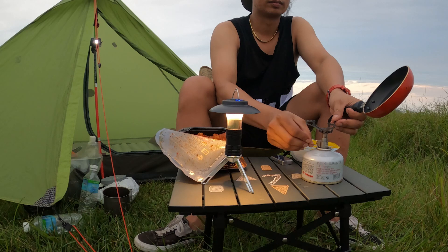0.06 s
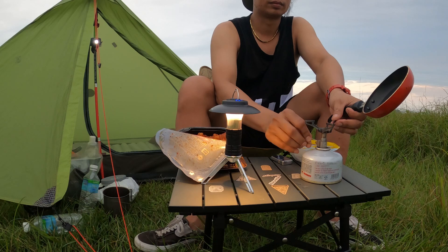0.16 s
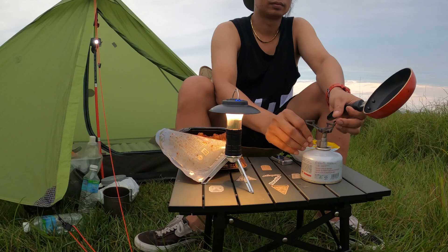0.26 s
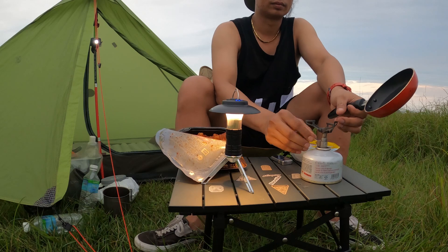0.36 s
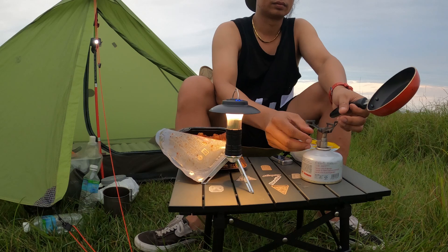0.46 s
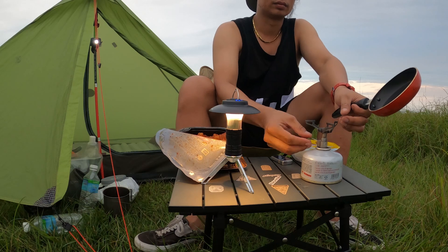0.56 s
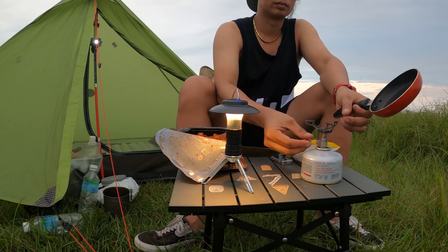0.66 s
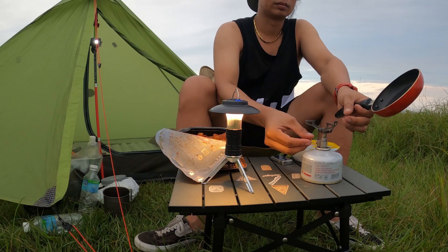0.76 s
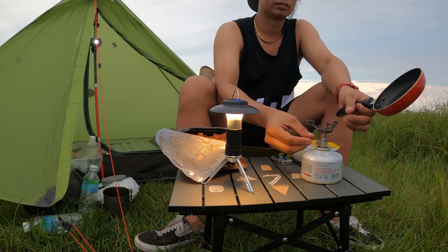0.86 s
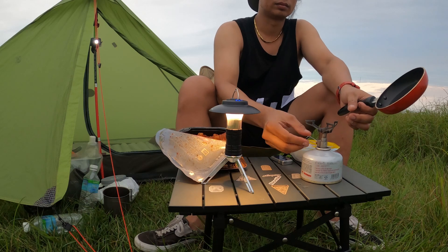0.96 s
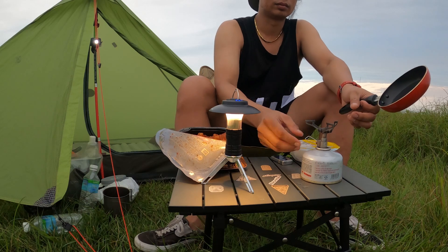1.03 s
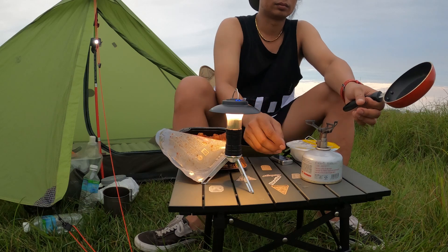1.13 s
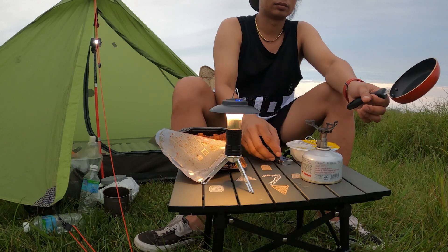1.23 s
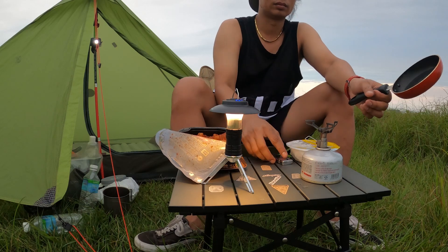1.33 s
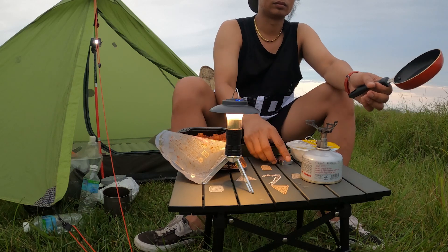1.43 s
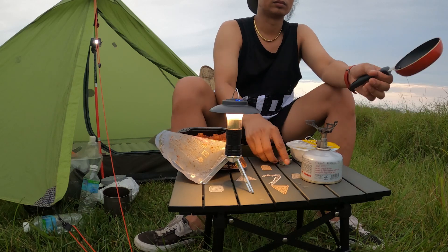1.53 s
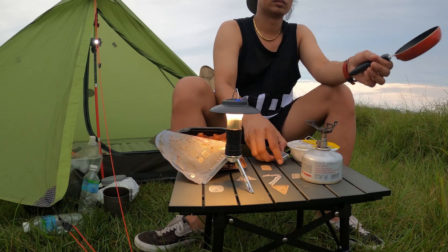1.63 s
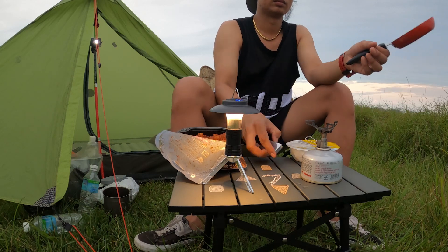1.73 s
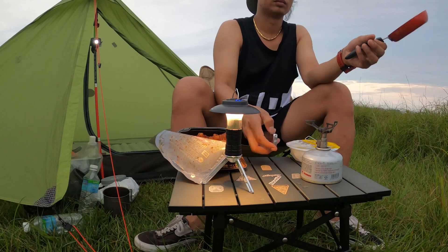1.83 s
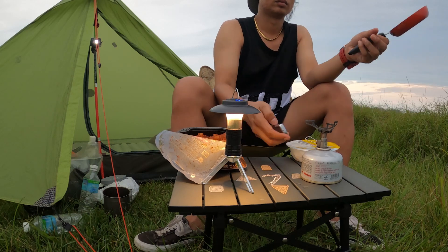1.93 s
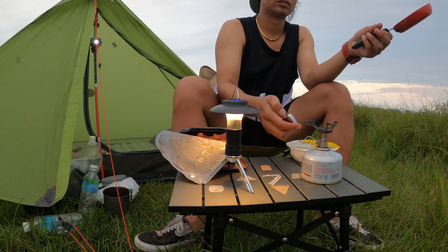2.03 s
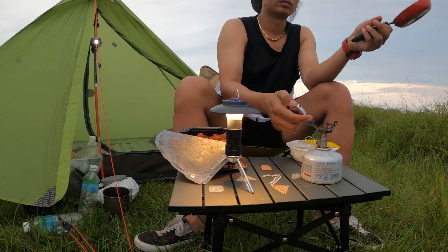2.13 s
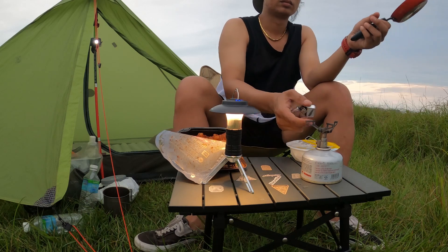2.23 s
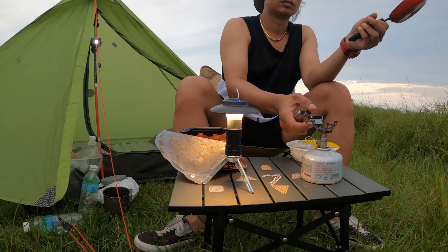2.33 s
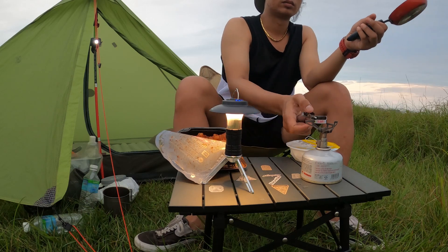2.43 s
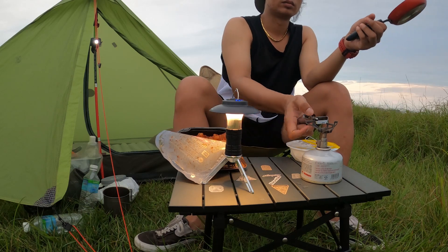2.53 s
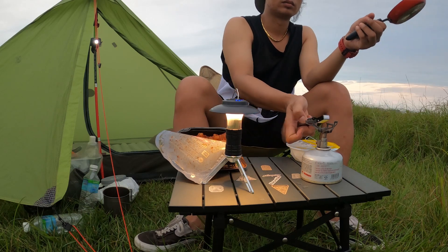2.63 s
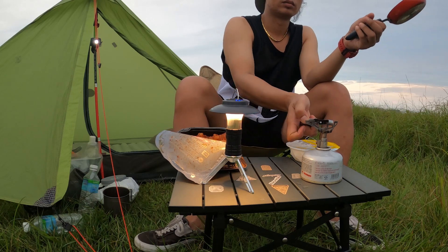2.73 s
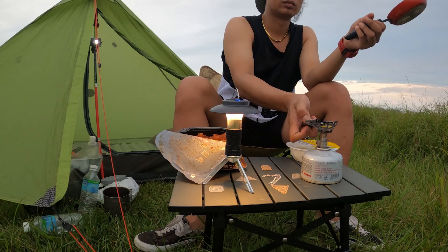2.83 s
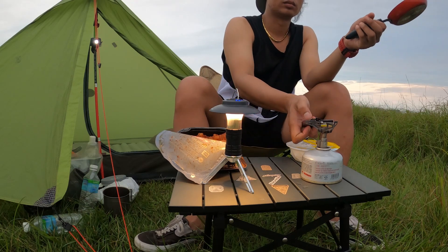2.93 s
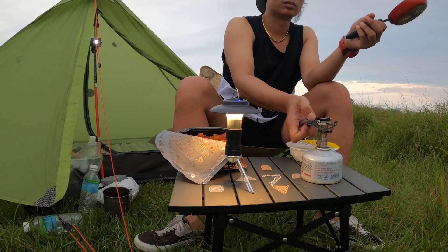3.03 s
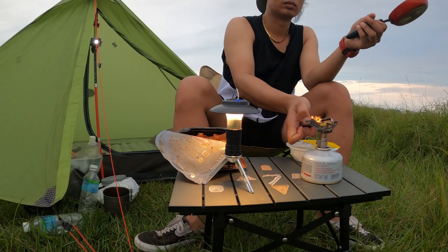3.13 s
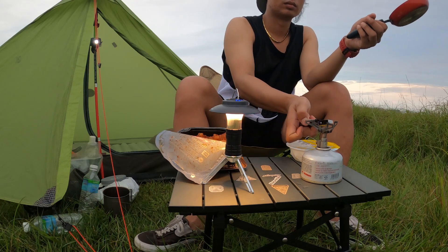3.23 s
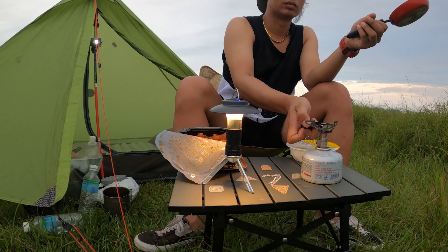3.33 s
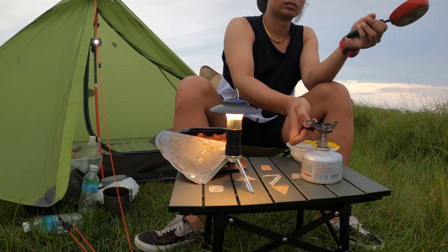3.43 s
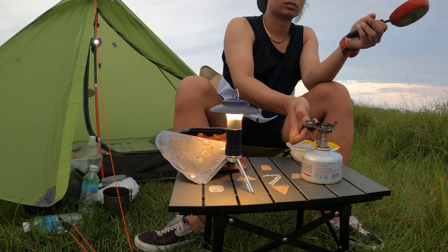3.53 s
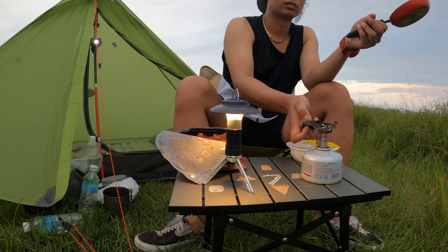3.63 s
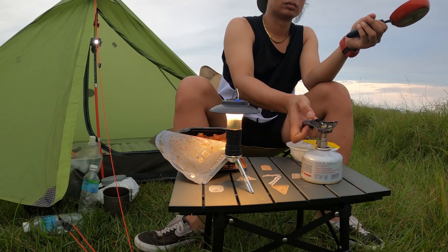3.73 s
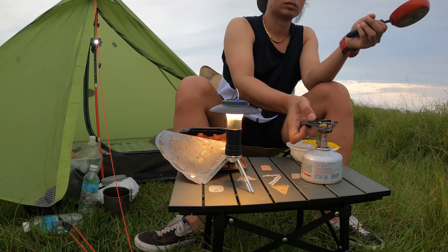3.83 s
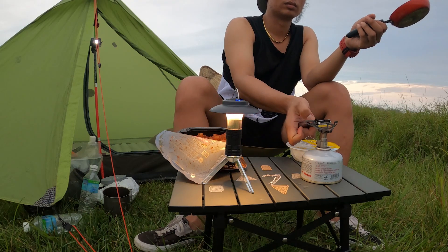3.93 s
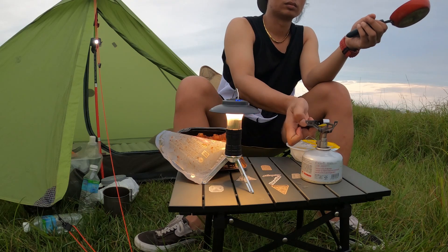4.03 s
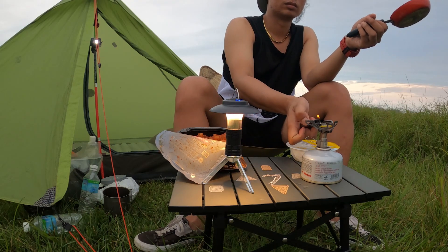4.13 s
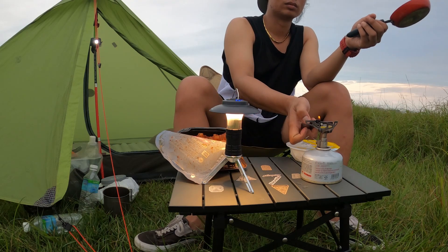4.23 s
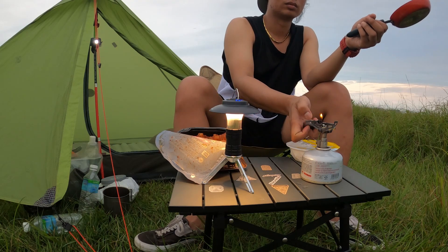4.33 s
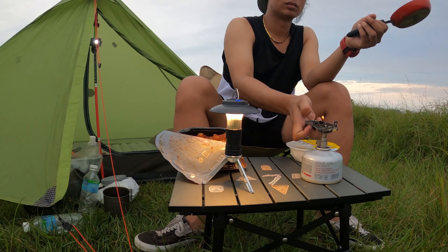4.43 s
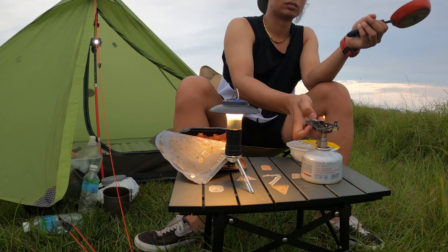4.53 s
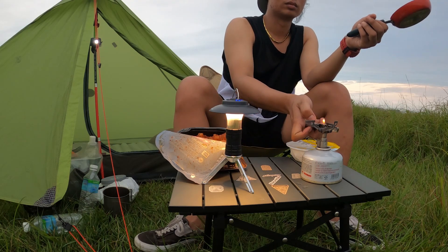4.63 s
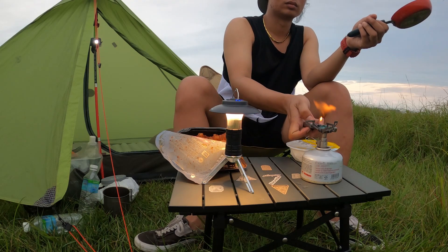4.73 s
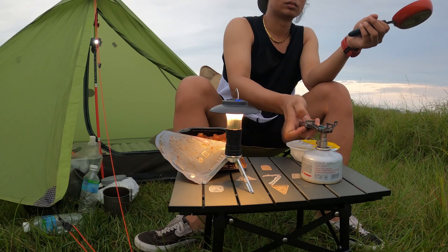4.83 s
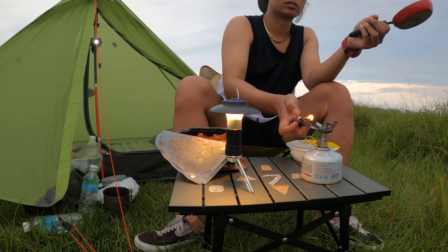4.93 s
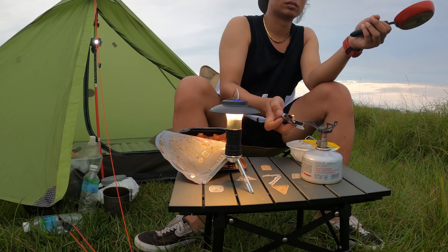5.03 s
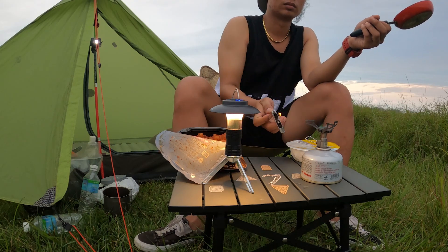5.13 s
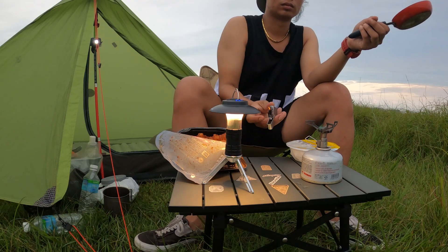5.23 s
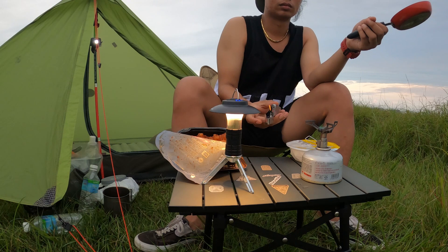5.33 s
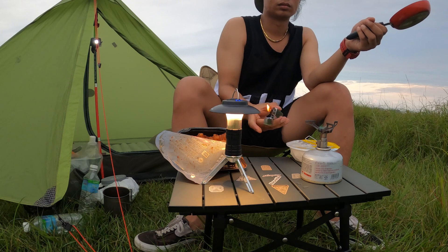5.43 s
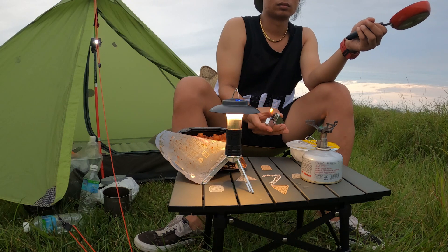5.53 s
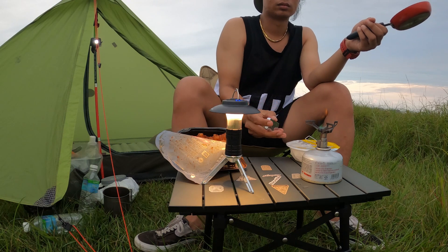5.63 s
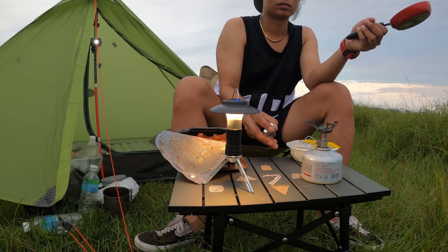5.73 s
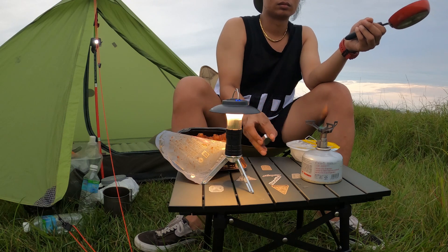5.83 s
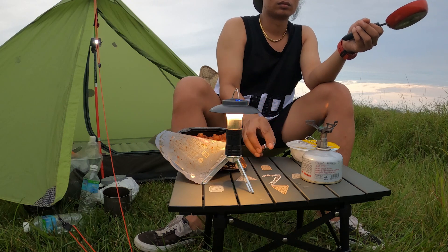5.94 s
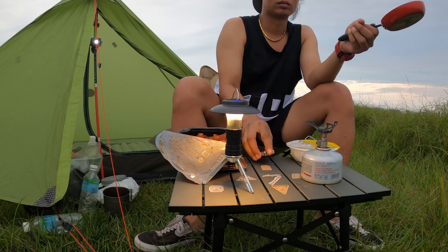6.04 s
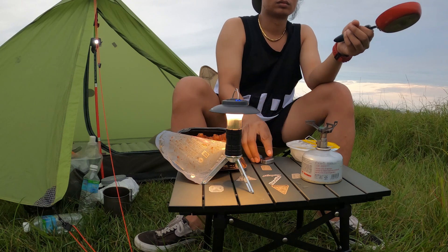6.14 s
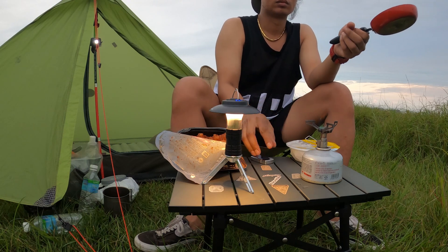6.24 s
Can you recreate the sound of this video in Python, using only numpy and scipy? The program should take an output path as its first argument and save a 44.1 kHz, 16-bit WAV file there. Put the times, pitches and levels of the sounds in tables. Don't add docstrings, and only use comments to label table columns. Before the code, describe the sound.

Outdoors, with low light wind and thin insect trills, a valve is tapped and turned, and a bright rough gas hiss begins and continues. A steel lighter clatters off the table, clicks open and grinds three times without success. A short fourth strike sets off a deep whump and soft crackling flame roar. One hard metallic snap closes the lid, then light knocks. Close microphones, dry open air.

```python
import sys
import numpy as np
from scipy import signal
from scipy.fft import rfft, irfft, next_fast_len
from scipy.io import wavfile
from scipy.ndimage import uniform_filter1d

SR = 44100
rng = np.random.default_rng(int(sys.argv[2]) if len(sys.argv) > 2 else 0)


def gain_from_db(level_db):
    decades = np.asarray(level_db, float) / 20
    return 10 ** decades


def to_wav(sig):
    pcm = np.clip(np.atleast_2d(sig), -1, 1) * 32767
    pcm = np.round(pcm).astype(np.int16)
    wavfile.write(sys.argv[1], SR, pcm.T)


N = 276948
THUMP_S = 4.869


def evened(x):
    return x / np.sqrt(np.mean(x ** 2) + 1e-20)


def curve(rows):
    return np.interp(np.arange(N) / SR, *np.transpose(rows))


def add(mix, s, sound):
    part = mix[round(s * SR):][:len(sound)]
    part += sound[:len(part)]


def ring(x, hz, width_hz):
    return signal.lfilter(*signal.iirpeak(hz, hz / width_hz, SR), x)


def low_pass(x, order, hz):
    return signal.lfilter(*signal.butter(order, 2 * hz / SR), x)


def noise(colour, size, patchy_db, flicker_db):
    hz = np.fft.rfftfreq(size, 1 / SR)
    frames = 4 * N // size + 5
    a, b, patches = rng.standard_normal((3, frames, len(hz)))
    patches = evened(uniform_filter1d(uniform_filter1d(patches, 8, 0), 6, 1))
    flicker = rng.standard_normal(frames)
    flicker = evened(uniform_filter1d(flicker, 3) - uniform_filter1d(flicker, 25))[:, None]
    f, level_db = np.transpose(colour)
    shape_db = np.interp(np.log(hz + 1), np.log(f), level_db, left=level_db[0] - 7, right=-90)
    spectra = (a + 1j * b) * gain_from_db(shape_db + patchy_db * patches + flicker_db * flicker)
    return evened(signal.istft(spectra.T, nperseg=size, noverlap=3 * size // 4)[1][:N])


def ports(x, loose, aside):
    # pitch_hz, right_minus_left_db, lead [radians], likeness [0-1]
    port_rows = [(0, 0, 0, 1), (150, .3, .03, .998), (900, 2.5, .2, .98), (2300, 0, .8, .93),
                 (4300, -2.5, 1.2, .92), (5600, -5, 2.5, .92), (6050, 0, 3.15, .95), (6800, 8, 4, .85),
                 (7700, 14, 5.7, .75), (8200, 3, 6.6, .8), (9100, 0, 6.4, .75), (9900, -8, 7.7, .35),
                 (11000, -2, 9.5, .6), (14000, 0, 12.3, .5)]
    size = next_fast_len(N + SR // 10)
    hz, t = np.fft.rfftfreq(size, 1 / SR), np.arange(2000) / SR
    f, more_db, lead, same = np.transpose(port_rows)
    same = np.clip(np.interp(hz, f, same), 0, 1) ** loose
    scatter = rfft(rng.standard_normal(len(t)) * gain_from_db(-60 * t / 0.04), size)
    scatter /= np.sqrt(uniform_filter1d(abs(scatter) ** 2, 1000))
    turned = same * np.exp(1j * aside * np.interp(hz, f, lead))
    right = turned + np.sqrt(1 - same ** 2) * scatter
    right = right * gain_from_db(aside * np.interp(hz, f, more_db))
    return np.array([x, irfft(rfft(x, size) * right, size)[:N]])


def wind():
    # time_s, level_db
    gusts = [(0.0, -60), (1.15, -58), (1.9, -60.5), (3.9, -60.5), (4.4, -59), (6.28, -57)]
    # pitch_hz, level_db
    breeze = [(20, -7), (60, 6), (110, -8), (160, 2.5), (250, -8.5), (350, -31), (500, -26), (800, -38)]
    common, left, right = (noise(breeze, size=2048, patchy_db=2.0, flicker_db=2.0) for _ in range(3))
    return gain_from_db(curve(gusts)) * (common + gain_from_db(-5) * np.array([left, right]))


def meadow():
    # pitch_hz, level_db
    hush = [(300, 6), (600, -12), (1300, -5.5), (2800, -14), (3600, -32), (4200, -4.5), (4900, -9.5),
            (5600, -15), (7000, -13), (9000, -20.5), (11800, -29), (12200, -54)]
    return gain_from_db(-71) * noise(hush, size=1024, patchy_db=0.0, flicker_db=-0.5)


def crickets():
    # start_s, end_s, first_rate [pulses per s], last_rate [pulses per s]
    trills = [
        (.005, .23, 47, 47),
        (.311, .89, 46.8, 43.3),
        (4.166, 4.99, 46.65, 44.3),
    ]
    # pitch_hz, rasp [0-1], level_db
    wings = [
        (4750, 1.1, -66.5),
        (4200, 1.0, -69.5),
        (4480, .12, -48.5),
    ]
    out = np.zeros(N)
    draws = rng.standard_normal((len(trills), 2, SR))
    for (s, end, rate, last_rate), (hz, rasp, db), z in zip(trills, wings, draws):
        t = np.arange(0, end - s, 1 / SR)
        u = np.cumsum(np.linspace(rate, last_rate, len(t))) / SR % 1
        unsteady = gain_from_db(evened(uniform_filter1d(z[0], 1500))[:len(t)])
        stroke = (np.exp(-((u - 0.35) / (0.09 + 0.04 * rasp)) ** 2) + 0.5 * rasp) * unsteady
        pitch = hz * (1 - 0.079 * rasp ** 0.5 * np.sin(2 * np.pi * (u - 0.35)))
        tone = np.sin(2 * np.pi * np.cumsum(pitch) / SR)
        tone += rasp * evened(ring(ring(z[1], hz, 800), hz, 800))[:len(t)]
        add(out, s - 0.005, gain_from_db(db) * stroke * tone * signal.windows.tukey(len(t), 0.25))
    return out


def rubs(rows, high_hz=None, high_ratio=None):
    out = np.zeros(N)
    t = np.arange(4000) / SR
    for s, length, db, hz, high_db in rows:
        z = rng.standard_normal((2, len(t)))
        slips = z[0] * gain_from_db(4.5 * evened(uniform_filter1d(z[1], 40)))
        stroke = np.minimum(t / 0.0014, 1) * gain_from_db(-60 * np.maximum(t - length, 0) / 0.062)
        low, high = (ring(ring(slips, f, 0.5 * f), f, 0.66 * f) for f in (hz, high_hz or high_ratio * hz))
        add(out, s, gain_from_db(db) * stroke * (evened(low) + gain_from_db(high_db) * evened(high)))
    return out


def metal_rubs():
    # start_s, length_s, level_db, low_hz, edge_db [against the low tone]
    metal_rows = [(.068, .009, -62, 1537, -17), (0.099, .0044, -54, 4700, -5), (0.099, 0.03, -57, 1750, -6),
                  (.097, 0.0088, -46, 750, -20), (.192, 0.02, -57.5, 1210, -9),
                  (0.198, 0.028, -54, 1520, -4.5), (.24, .036, -48.5, 1380, -2),
                  (0.378, 0.017, -64, 1160, -17), (.482, 0.027, -56, 1510, -4.5),
                  (0.527, .016, -68, 1290, -5), (1.409, 0.017, -56, 1320, 6), (1.439, .012, -45, 2220, -16),
                  (1.636, 0.031, -57, 1800, 9.5), (1.683, 0.041, -65, 1960, 9.5),
                  (1.782, 0.024, -59.5, 925, 2.5), (5.658, .012, -60.5, 3570, 3),
                  (5.726, .019, -49, 2300, -3.5)]
    return rubs(metal_rows, high_hz=3880)


def table_pushes():
    # start_s, length_s, level_db
    push_rows = [
        (0.094, 0.0078, -45),
        (.245, 0.026, -60),
        (1.435, 0.0038, -38.5),
        (1.633, 0.056, -68.5),
        (1.553, .01, -64),
        (0.43, 0.017, -68.5),
        (3.298, 0.011, -54.5),
        (4.126, 0.023, -68),
    ]
    return rubs([(*row, 428, 1.67) for row in push_rows], high_hz=1230)


def fizzes():
    # start_s, length_s, level_db, pitch_hz
    fizz_rows = [
        (.383, 0.014, -50.5, 6200),
        (1.633, .039, -69, 13000),
        (5.66, .006, -72, 13500),
        (5.3, .003, -64, 7200),
        (0.082, .006, -39, 7000),
    ]
    return rubs([(*row, -16.5) for row in fizz_rows], high_ratio=1.56)


def knocks(rows, chatter_hz, ring_s):
    out = np.zeros(N)
    t, t60 = np.arange(4000) / SR, np.clip(ring_s, 0.005, 0.2)
    for s, db, hz, chatter_db in rows:
        fade = gain_from_db(-60 * t / 0.0041) + gain_from_db(6.0 - 60 * t / t60)
        contact = rng.standard_normal(len(t)) * fade * np.minimum(t / 0.00058, 1)
        low = ring(ring(contact, hz, 9.5 / t60), hz, 1600)
        high = ring(ring(contact, chatter_hz, 1400), chatter_hz, 1400)
        add(out, s, gain_from_db(db) * (low / abs(low).max() + gain_from_db(chatter_db) * high / abs(high).max()))
    return out


def valve_knocks():
    # start_s, level_db, low_hz, chatter_db [against the low ring]
    valve_rows = [
        (.078, -21.5, 1430, -12.5),
        (.094, -19, 1520, 1.5),
        (.237, -45.5, 1240, 9.5),
        (.345, -49, 1280, -20),
        (.754, -61.5, 1250, -5),
    ]
    return knocks(valve_rows, chatter_hz=3640, ring_s=0.037)


def table_knocks():
    # start_s, level_db, low_hz, chatter_db [against the low ring]
    table_rows = [
        (1.406, -44, 2390, 13.5),
        (1.435, -27, 2410, 0.5),
        (1.551, -52, 1100, 8),
        (1.436, -33.5, 1134, -20),
        (1.631, -46, 2500, 11),
        (1.69, -50, 2420, 13),
        (1.784, -43, 945, -2),
        (1.81, -44, 1450, 4.5),
        (6.066, -43.5, 710, -18),
        (6.213, -43, 1110, -6),
    ]
    return knocks(table_rows, chatter_hz=4050, ring_s=0.048)


def case_taps():
    # start_s, level_db, low_hz, chatter_db [against the low ring]
    tap_rows = [
        (2.22, -46, 1970, 0),
        (2.228, -51, 1960, 5),
        (2.429, -52.5, 2020, 6),
        (2.716, -72, 2900, 14),
        (2.784, -45, 2000, -8),
        (2.8, -43.5, 2045, 4),
        (3.313, -45, 2020, 8),
        (3.321, -47, 2070, -4),
        (4.135, -40.5, 2000, 3.5),
    ]
    return knocks(tap_rows, chatter_hz=3460, ring_s=0.08)


def latch_clicks():
    # start_s, level_db, low_hz, chatter_db [against the low ring]
    click_rows = [
        (2.343, -20.5, 2670, -14),
        (2.383, -36, 3180, -14),
        (3.305, -36, 1900, 9.5),
        (4.865, -33, 1290, -10),
    ]
    return knocks(click_rows, chatter_hz=5000, ring_s=0.014)


def lid_shut():
    # start_s, level_db, low_hz, chatter_db [against the low ring]
    shut_rows = [
        (5.7625, -17.5, 3430, -8),
        (5.7625, -32, 7040, -20),
        (5.765, -7, 2300, -0.5),
        (5.766, -26, 6900, -26),
        (5.765, -33, 13800, -24),
        (5.768, -18.5, 2200, -3),
    ]
    return knocks(shut_rows, chatter_hz=5300, ring_s=0.007)


def lighter():
    # stroke_end_s, stroke_length_s, level_db, case_ring_db
    strike_rows = [
        (2.776, 0.031, -32, -45.5),
        (3.3, 0.029, -31.5, -48),
        (4.131, 0.041, -30.5, -53),
        (4.871, .008, -45, -79),
    ]
    # pitch_hz, level_db
    flint = [(600, -15.5), (2000, -8.5), (3500, 8), (5000, 12), (7000, -6), (9000, -12.5), (11000, -12.5),
             (13500, -13.5), (16000, -39)]
    # lid_open_db, strike_db, t60_s [time to fade by 60 dB]
    case_rows = [(-10.5, 4, 0.12), (-5.5, 2, 0.048), (30, -3, 0.0065), (6, -25, 0.043), (5.5, -19.5, 0.055),
                 (-1.5, -7, 0.27), (0.5, -27, 0.067), (-9.5, -28, 0.24), (-28, -40, .15), (-26, -38, 0.22),
                 (-15, -32, 0.048)]
    case_hz = [2008, 2046, 3300, 3903, 4985, 6589, 7289, 10420, 10990, 13580, 14250]
    lid_s, lid_db = 2.402, -32.5
    out, t = np.zeros(N), np.arange(16000) / SR
    open_db, strike_db, t60 = np.transpose(case_rows)[:, :, None]
    tones = np.sin(2 * np.pi * np.outer(case_hz, t)) * gain_from_db(-60 * t / t60) * np.minimum(t / 0.0027, 1)
    add(out, lid_s, gain_from_db(lid_db) * (gain_from_db(open_db) * tones).sum(0))
    grind = noise(flint, size=256, patchy_db=-3.5, flicker_db=2.0)
    snap = gain_from_db(-60 * t / 0.012) * signal.lfilter([1, -1], 1, grind[:len(t)])
    add(out, lid_s, gain_from_db(-14.5) * snap)
    for s, length, db, case_db in strike_rows:
        u = np.arange(N) / SR - s
        rasp = gain_from_db(-18 + 14 * u / length) + gain_from_db(18 * (u + 0.0017).clip(None, 0) / 0.0077)
        tail = gain_from_db(-11.5 - 60 * u / 0.12)
        out += grind * gain_from_db(db) * np.where(u < 0, rasp, tail) * (u > -3 * length)
        add(out, s + 0.006, gain_from_db(case_db) * (gain_from_db(strike_db) * tones).sum(0))
    return out


def gas():
    # pitch_hz, level_db
    jet = [(600, -26), (2550, -11), (3000, -2), (3750, -5.5), (4600, 2), (5600, -2), (6300, -3),
           (7000, -10), (8000, -15.5), (9300, -12), (11200, -25), (12600, -25.5), (14500, -31),
           (14750, -69)]
    open_s, opening_s = 0.92, 0.097
    leak_db, leak_db_per_s = -91.5, 19.5
    jet_db, sag_db_per_s = -56, 0.54
    t = np.arange(N) / SR
    leak = gain_from_db(leak_db + leak_db_per_s * np.minimum(t, open_s))
    u = np.maximum(t - open_s, 0)
    flow = leak + gain_from_db(jet_db - sag_db_per_s * u) * (1 - np.exp(-u / opening_s))
    return flow * noise(jet, size=512, patchy_db=0.4, flicker_db=0.5)


def thump():
    level_db, start_hz = -8, 85
    t, out = np.arange(2400) / SR, np.zeros(N)
    turns = start_hz * 0.02 * (1 - np.exp(-t / 0.015))
    swell = np.exp(-(t / 0.0085) ** 0.95) * (1 - np.exp(-t / 0.0018))
    add(out, THUMP_S, -gain_from_db(level_db) * np.sin(2 * np.pi * turns) * swell)
    return out


def flame():
    # pitch_hz, level_db
    roar_colour = [(40, -20), (100, -20), (170, 3.5), (290, -16), (450, 0), (700, -5), (860, -12.5),
                   (1300, -9), (1700, -13), (2250, -22.5), (3000, -18.5), (4500, -19.5), (7000, -72)]
    flame_db, flare_db, settle_s = -45, 4, 0.043
    breath_db, breath_s = 0.5, 0.67
    t = np.arange(N) / SR - THUMP_S
    catch = gain_from_db(-9.0) * np.clip((t + 0.03) / 0.024, 0, 1) + np.clip((t - 0.018) / 0.036, 0, 0.6)
    level_db = flame_db + flare_db * np.exp(-np.maximum(t - 0.03, 0) / settle_s)
    level_db = level_db - breath_db * np.cos(2 * np.pi * (t - 0.4) / breath_s)
    roar = noise(roar_colour, size=512, patchy_db=0.7, flicker_db=1.2)
    pop_sizes = gain_from_db(7.1 * np.minimum(rng.exponential(1, N), 3.5))
    pops = pop_sizes * (rng.random(N) < 250 / SR) * rng.choice([-1, 1], N)
    crackle = ring(pops, 1100, 1500) + 0.5 * ring(pops, 4300, 2500)
    crackle = low_pass(evened(ring(crackle, 2470, 3000)), 3, 7000)
    return gain_from_db(level_db) * catch * (roar + gain_from_db(-20) * crackle)


def scene():
    hand = valve_knocks() + table_knocks() + case_taps() + latch_clicks() + lid_shut()
    hand += metal_rubs() + table_pushes() + fizzes()
    at_valve = np.arange(N) < SR
    far = ports(meadow(), loose=30, aside=0.6)
    insects = ports(crickets(), loose=0.58, aside=1.0)
    valve = ports(low_pass(hand * at_valve, 3, 8000), loose=1.0, aside=0.58)
    hits = ports(lighter() + hand * ~at_valve, loose=0.3, aside=1)
    burner = ports(gas() + flame() + thump(), loose=1.0, aside=1)
    return wind() + far + insects + valve + hits + burner


def top_cut(x):
    return signal.sosfilt(signal.butter(12, 16640, fs=SR, output="sos"), x)


def record(dry):
    top_hz = 16300
    limited = signal.oaconvolve(dry, signal.firwin(255, top_hz, fs=SR)[None], "same")
    return top_cut(limited)


dry = scene()
out = record(dry)
to_wav(out)
```